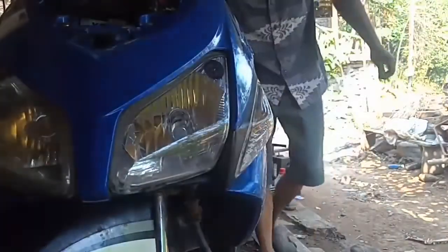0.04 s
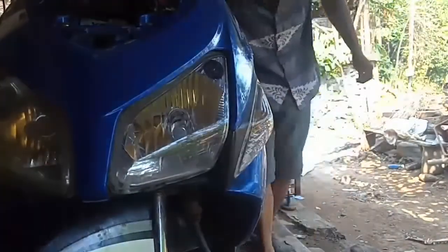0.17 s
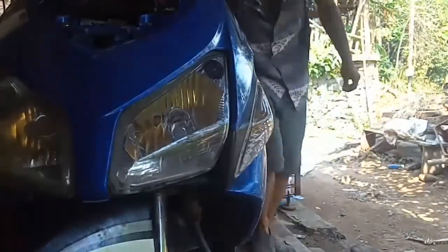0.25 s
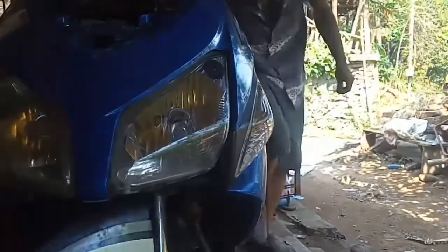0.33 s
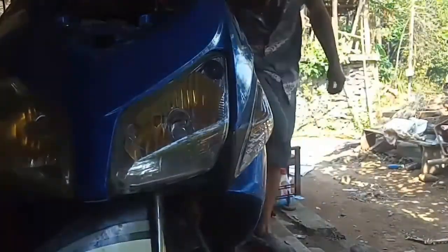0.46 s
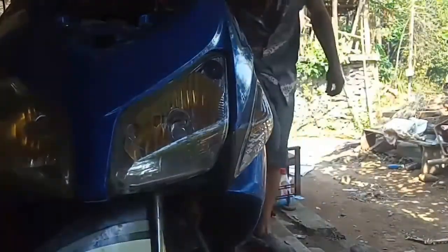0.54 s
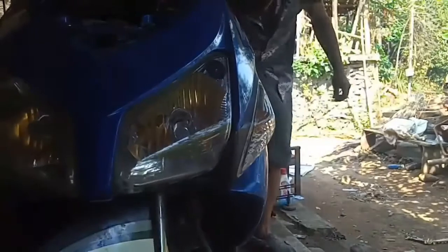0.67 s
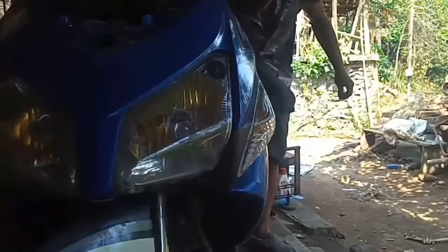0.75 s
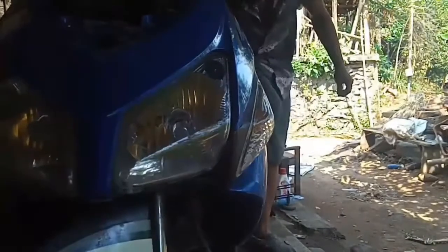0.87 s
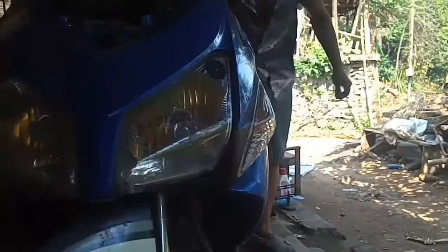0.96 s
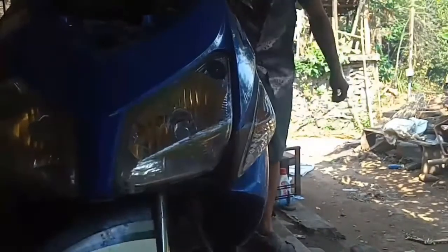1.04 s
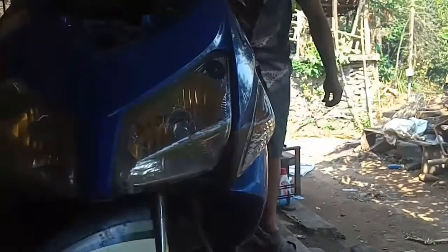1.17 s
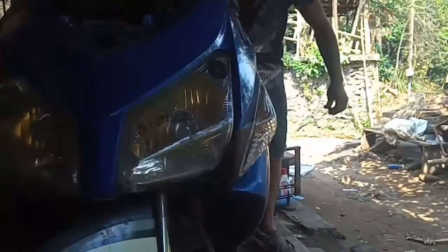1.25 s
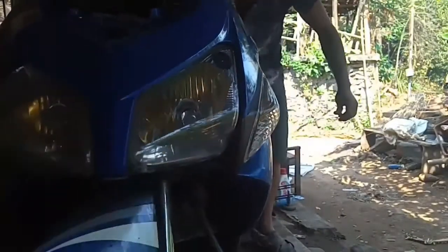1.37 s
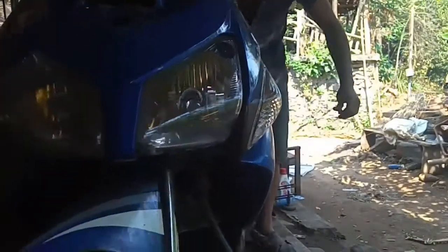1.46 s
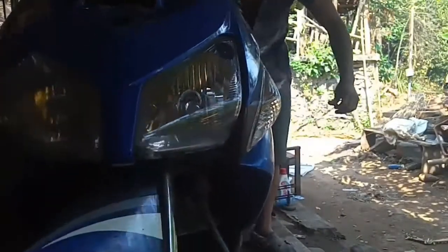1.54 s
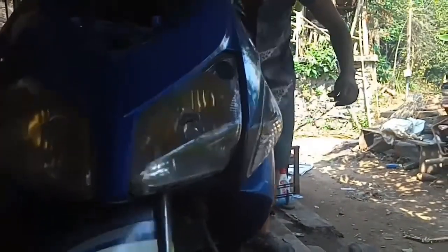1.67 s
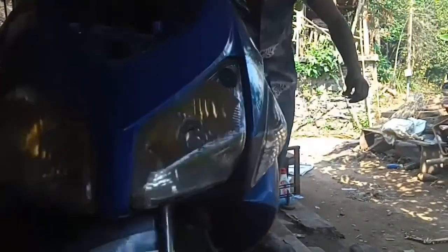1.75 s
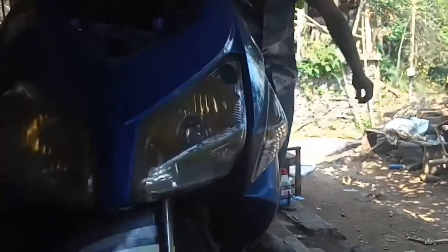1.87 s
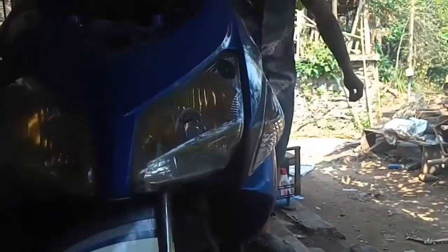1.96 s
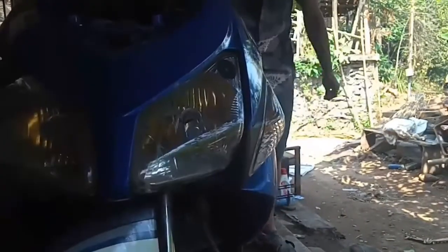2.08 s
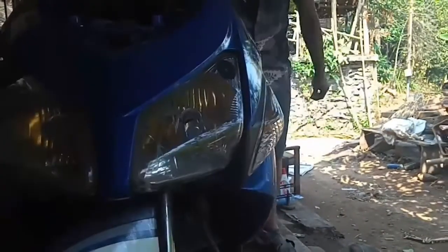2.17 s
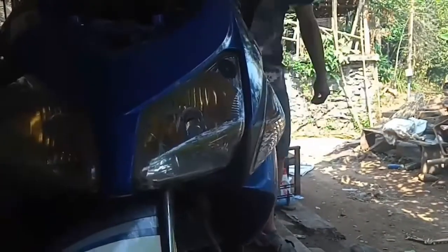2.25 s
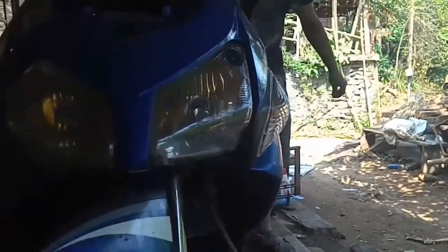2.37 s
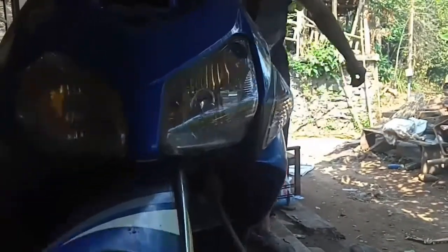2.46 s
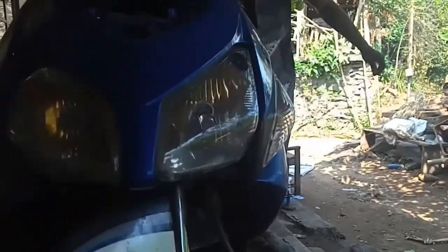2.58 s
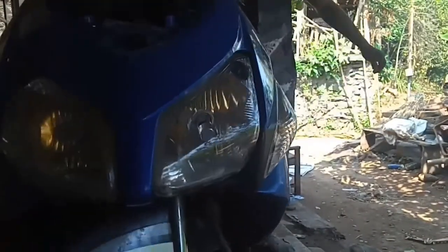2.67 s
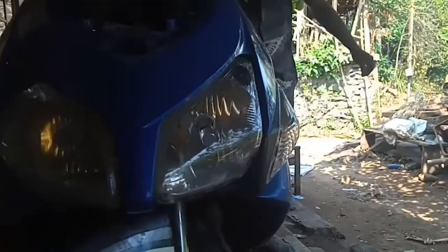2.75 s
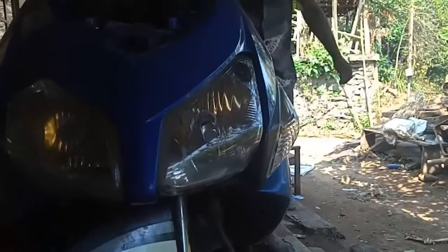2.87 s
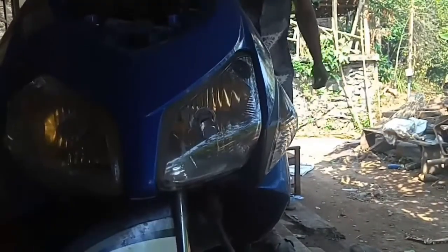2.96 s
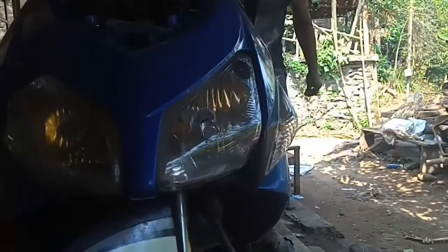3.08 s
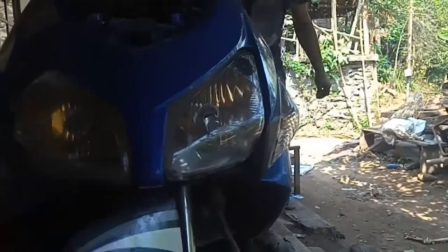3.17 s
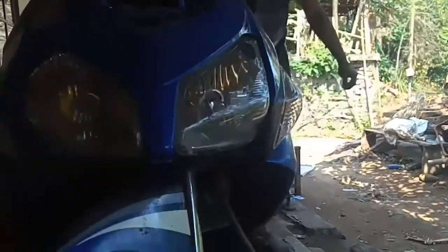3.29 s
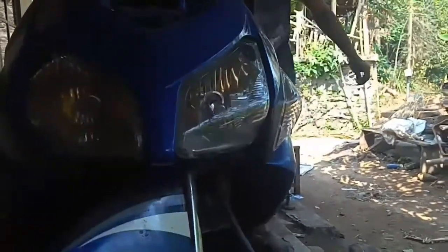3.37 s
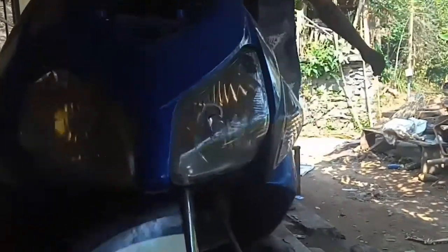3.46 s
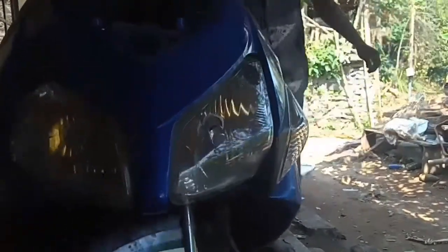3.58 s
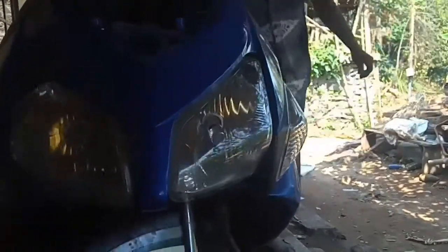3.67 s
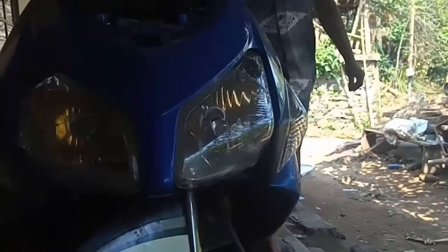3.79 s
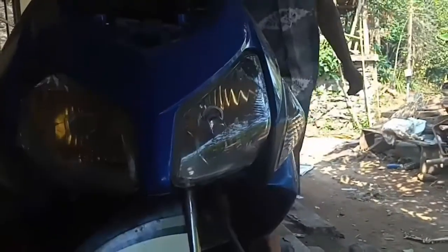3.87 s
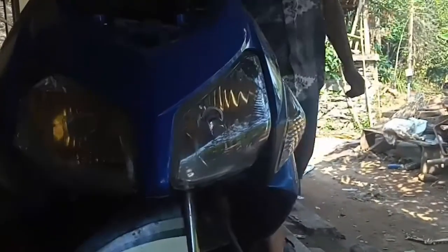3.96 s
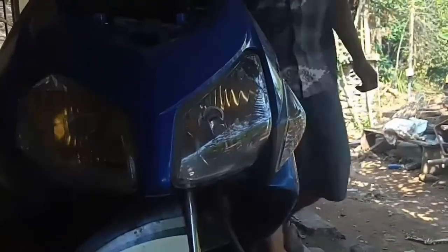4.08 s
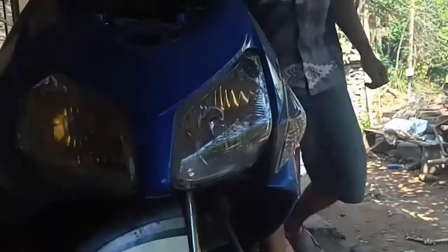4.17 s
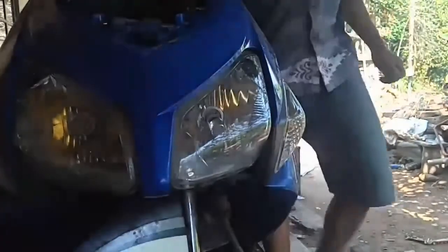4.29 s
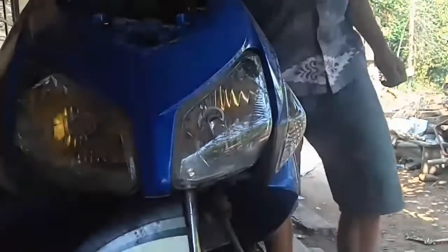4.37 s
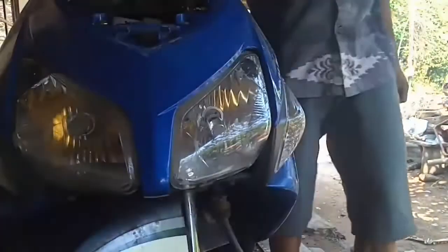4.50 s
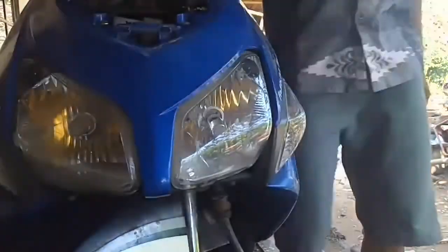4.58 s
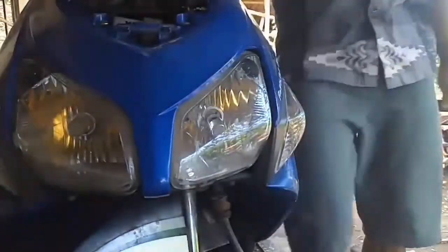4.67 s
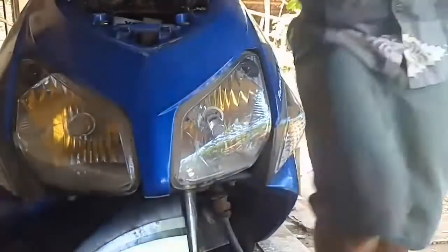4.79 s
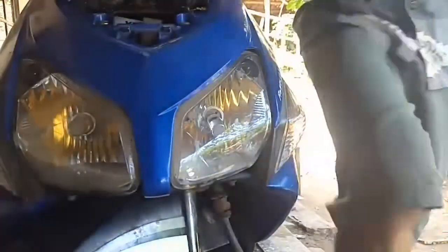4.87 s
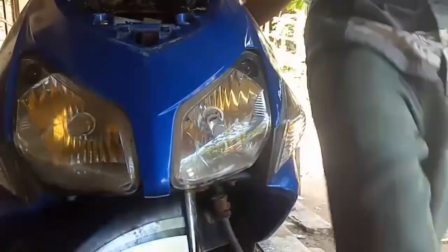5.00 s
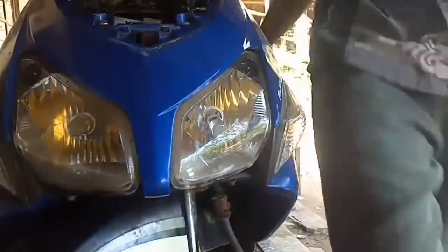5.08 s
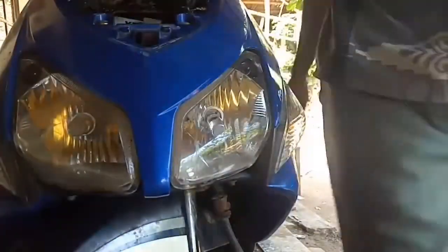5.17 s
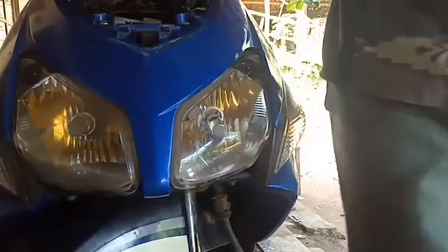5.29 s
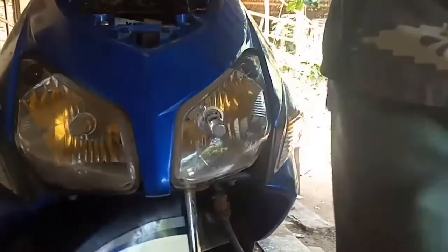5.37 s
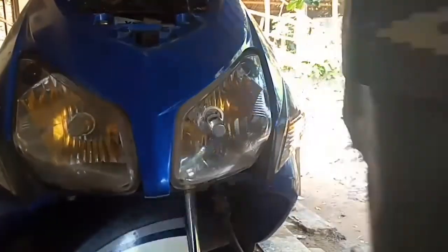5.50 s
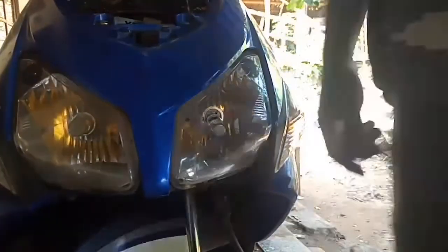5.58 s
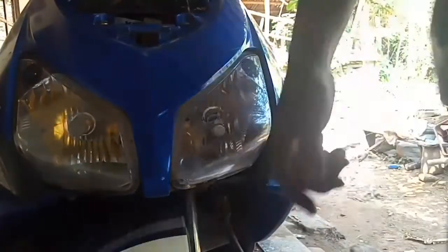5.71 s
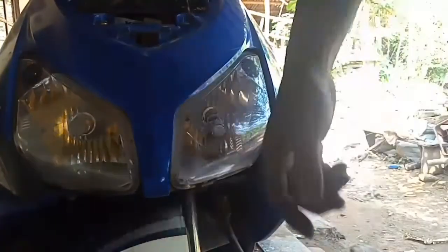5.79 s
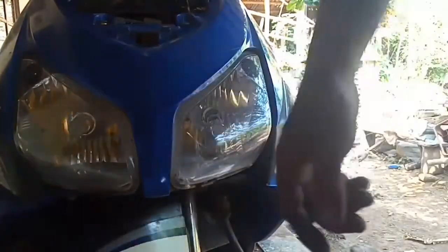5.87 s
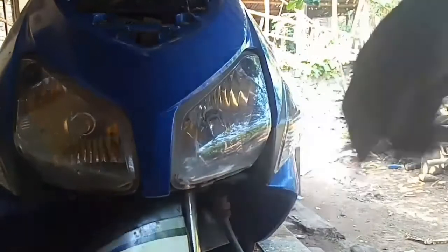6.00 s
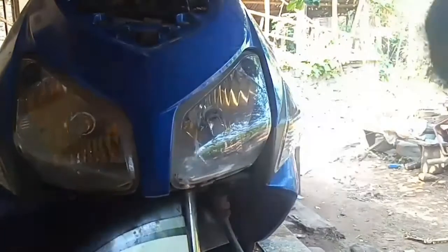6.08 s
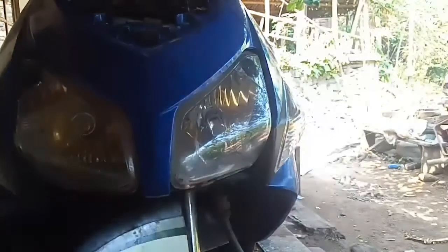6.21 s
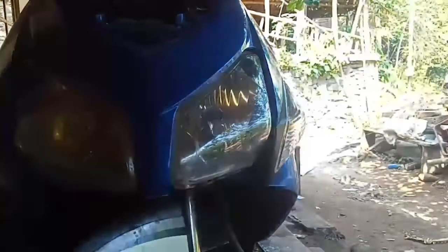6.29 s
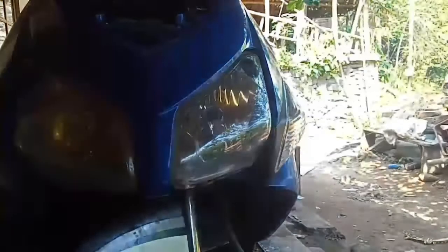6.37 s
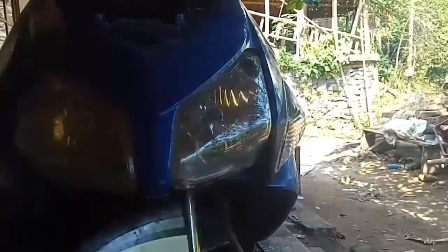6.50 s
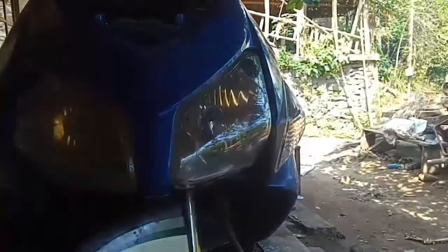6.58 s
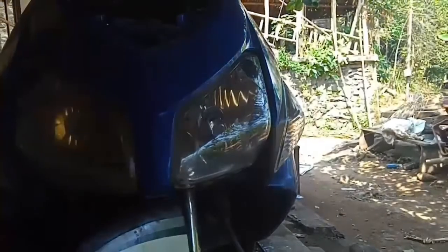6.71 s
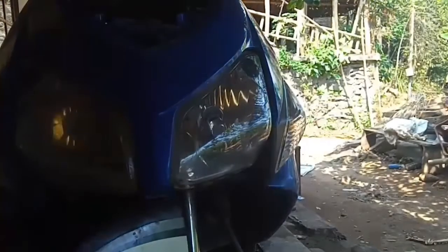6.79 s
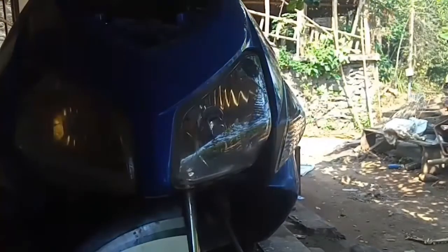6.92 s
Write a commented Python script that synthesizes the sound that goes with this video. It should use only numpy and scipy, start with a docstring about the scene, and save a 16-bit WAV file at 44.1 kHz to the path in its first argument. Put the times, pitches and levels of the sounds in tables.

```python
"""In a yard, a metre from a phone, a scooter is kicked over four times without starting. The lever
engages, the crank rumbles, the engine thumps, the lever hits its stop and its gear rasps back. Then feet
shuffle on gritty concrete, a small steel part tinkles, things are shifted close by and air buffets the
microphone, all over a far hiss. Rattles and scrapes are thousands of tiny clicks, filtered to sound like
the part they shake."""
import sys
import numpy as np
from scipy import signal
from scipy.fft import rfft, irfft
from scipy.io import wavfile
from scipy.ndimage import uniform_filter1d

SR = 44100
rng = np.random.default_rng(int(sys.argv[2]) if len(sys.argv) > 2 else 0)


def to_wav(s):
    """Save 16-bit WAV."""
    ch = np.atleast_2d(s).T  # columns
    pcm = np.round(np.clip(ch, -1, 1) * 32767)  # PCM
    wavfile.write(sys.argv[1], SR, pcm.astype(np.int16))


N = 306315
TIME = np.arange(N) / SR

# Tone of the far hiss: pitch_hz, level_db
HISS_TONE = [(90, -13.5), (150, -5), (400, -6.5), (900, -10), (1800, -11.5), (3300, -9), (4200, -13.5),
             (5100, -19), (6300, -15), (7700, -9), (9500, -21), (12000, -24.5), (16000, -22.5)]
# Loudness of the far hiss: time_s, level_db
HISS_LEVELS = [(0, -52), (.6, -55), (3.6, -55), (4.7, -58.5), (5.5, -59), (6.95, -55)]
# Low rumbling swells, engine thumps during the kicks and air on the microphone otherwise:
# loudest_s, level_db, rise_and_fall_db_per_s
LOW_SWELLS = [(0.05, -68, 60), (0.58, -61, 64), (0.89, -54.5, 75), (1.43, -41, 122), (1.66, -52.5, 80),
              (2.18, -49, 700), (2.37, -44, 200), (2.58, -50, 40), (2.82, -52, 150), (3.1, -55, 140),
              (3.32, -44, 87), (3.96, -65, 120), (5.2, -60, 100), (5.45, -56.5, 48), (5.78, -39, 212),
              (6.01, -39.5, 200), (6.13, -48, 150), (6.25, -51, 170), (6.37, -56, 300), (6.46, -59, 130),
              (6.62, -60, 100), (6.85, -56.5, 110)]
# Sudden jolts of air on the microphone: start_s, level_db, pitch_hz, rise_s
AIR_JOLTS = [(1.429, -39.5, 202, 0.0097), (2.167, -51, 117, 0.011), (5.399, -51, 94, 0.0081),
             (5.745, -63, 116, 0.016), (5.772, -30, 127, 0.011), (5.884, -39, 118, 0.0078),
             (5.994, -28.5, 105, 0.0046)]

# Touches on a small steel part: start_s, level_db, muffled_after_s
STEEL_TOUCHES = [(5.354, -44, 0.067), (5.424, -38, 0.059)]
# The notes it rings with: pitch_hz, level_db, fade_s (time to drop 60 dB)
STEEL_NOTES = [(2779, 2, 0.6), (4920, -4, 0.24), (5800, -13, 0.47), (7270, -4, 0.35), (9600, -22, .2),
               (10150, -18, .4), (12310, -21, 0.55)]
# Bright tone of grit and hard edges: pitch_hz, level_db
TICK_TONE = [(4000, -41.5), (5300, -7), (6500, -0.5), (7800, 5.5), (9300, -5), (11500, -9.5), (14000, -4.5),
             (16500, -14.5)]
# Footfalls and small knocks: start_s, knock_db, knock_hz, thud_hz, thud_db, tick_db, base_fade_s
STEPS = [(0.4468, -30.5, 647, 370, -28.5, -54, 0.043), (3.9285, -32.5, 1340, 765, -40, -58, 0.071),
         (4.1609, -30, 1220, 282, -34, -35, 0.051), (4.2837, -30, 1770, 360, -55, -54, 0.16),
         (4.4331, -37.5, 1440, 370, -48, -53, 0.049), (4.472, -29.5, 1420, 475, -57, -50, 0.044),
         (4.4837, -24.5, 1080, 562, -31.5, -44, 0.059), (4.5442, -28.5, 3580, 370, -58, -30.5, 0.13),
         (4.6061, -20.5, 1870, 566, -28, -26.5, 0.063), (5.148, -35.5, 1290, 280, -37.5, -24.5, 0.033),
         (5.1831, -26.5, 2000, 860, -37, -30, 0.059), (5.2042, -27.5, 2180, 740, -49, -21, 0.042),
         (5.2154, -27.5, 3900, 380, -58, -41, 0.055), (5.2936, -22, 3980, 880, -45, -13.5, 0.07),
         (5.3158, -30.5, 1110, 323, -42, -36, 0.044), (5.3356, -29, 4170, 880, -47, -23, 0.074),
         (5.3504, -26, 2850, 870, -50, -40, 0.045), (5.4221, -21, 3070, 910, -40, -26, 0.038),
         (5.8124, -45, 3270, 200, -60, -36, 0.059), (5.9359, -11.5, 2020, 660, -39, -40, 0.051),
         (5.9464, -13.5, 1430, 190, -33, -40, 0.1), (6.0091, -26, 3880, 199, -41, -34, 0.072),
         (6.0222, -21.5, 2700, 462, -36.5, -52, 0.093), (6.0418, -29, 2870, 237, -57, -31.5, 0.21),
         (6.4054, -26.5, 3050, 538, -61, -38, 0.05), (6.4326, -31, 3030, 417, -60, -38, 0.032),
         (6.5217, -10.5, 1620, 802, -44, -36, 0.29), (6.6284, -40, 3350, 755, -46, -21.5, 0.12),
         (6.7534, -33, 2800, 272, -49, -28, 0.049), (6.8051, -17.5, 1413, 310, -29, -35, 0.036),
         (6.8423, -28, 2130, 730, -36, -45, 0.078)]
# Soles and cloth dragging: loudest_s, scrape_db, hiss_db, rub_db, rise_db_per_s, fall_db_per_s
DRAGS = [(0.454, -57, -56, -44.5, 2000, 157), (3.941, -58, -88, -50.5, 400, 252),
         (4.163, -54.5, -55, -45, 1200, 198), (4.286, -77, -56, -45, 900, 282),
         (4.49, -49, -51.5, -41.5, 502, 304), (4.615, -48.5, -51, -41, 174, 308),
         (5.207, -43.5, -42.5, -45, 226, 211), (5.354, -42.5, -42.5, -52.5, 202, 397),
         (5.435, -46.5, -51, -57, 1500, 300), (5.954, -42, -58, -34, 2000, 600),
         (6.022, -43, -50, -37, 1200, 272), (6.275, -45, -37, -51.5, 175, 117),
         (6.502, -35.5, -34.5, -45.5, 155, 291), (6.533, -28, -33, -43.5, 1500, 420),
         (6.58, -41.5, -40.5, -49, 300, 150), (6.634, -38, -42, -50, 650, 310),
         (6.758, -48.5, -49, -55, 87, 550), (6.818, -57, -49, -39, 2000, 400),
         (6.858, -40.5, -47.5, -43, 500, 700), (6.946, -44.5, -50, -73, 700, 300)]

# Tone of rasping gear teeth: pitch_hz, level_db
RASP_TONE = [(500, -8.5), (1000, 3), (2000, 4), (3000, 7), (4000, 10.5), (4900, -1.5), (6000, -23.5)]
# Where the gear and its cover ring: pitch_hz, width_hz, level_db
GEAR_NOTES = [(1180, 135, -12), (2027, 30, 5.5), (2180, 70, 0), (3080, 87, -6.5), (3614, 88, -3),
              (3805, 104, -4), (3990, 37, -0.5), (4190, 110, -9), (6400, 98, -1.5), (7210, 140, -6),
              (8400, 107, -8.5), (10300, 110, -10), (12000, 540, -16.5), (13700, 150, -26)]
# Where the crankcase rings: pitch_hz, width_hz, level_db
CASE_NOTES = [(1154, 79, 11), (1692, 33, 14), (2000, 22, 15.5), (3670, 11, -7), (3860, 31, -14.5),
              (4740, 180, -9), (6890, 38, 8), (7900, 37, -16), (8470, 31, -14.5), (7540, 33, -26)]
# Where the body panels ring: pitch_hz, width_hz, level_db
PANEL_NOTES = [(334, 190, 2), (582, 53, -2)]
# Blows of the lever and stand:
# start_s, knock_db, knock_hz, thud_hz, thud_db, tick_db, crack_vs_knock_db, base_fade_s
CLANKS = [(0.5347, -33, 1320, 468, -36, -52, -8, 0.15), (0.5867, -28, 3130, 830, -35, -14, 5, 0.053),
          (0.9016, -23, 1500, 640, -37, -17, -6, 0.24), (1.2323, -28.5, 3200, 325, -48, -25, -14, 0.19),
          (1.3314, -45, 1510, 587, -21.5, -25.5, -8, 0.14), (1.364, -37, 1200, 562, -27, -33, -8, 0.16),
          (1.4072, -39, 1640, 267, -25, -26.5, -6, 0.091), (1.481, -12.5, 2060, 677, -33, -9.5, -12, 0.25),
          (1.701, -18.5, 2020, 644, -29, -31, -14, 0.07), (1.8603, -14.5, 1630, 592, -25.5, -46, 7, 0.17),
          (1.9039, -30, 570, 338, -13, -55, 7, 0.07), (1.9534, -28.5, 1180, 663, -44, -35.5, -14, 0.4),
          (2.2323, -23.5, 2100, 350, -21, -25, -16, 0.15), (2.328, -26, 1420, 580, -43, -36, -12, 0.15),
          (2.4017, -18, 2000, 365, -27, -27, -13, 0.47), (2.4302, -14.5, 2000, 730, -43, -14.5, -30, 0.46),
          (2.9085, -13.5, 1636, 528, -35, -31, -26, 0.32), (2.9628, -43, 1760, 334, -25, -55, -8, 0.066),
          (3.0817, -29, 2130, 334, -29, -34.5, 11, 0.19), (3.1886, -23.5, 1440, 585, -36.5, -43, -16, 0.19),
          (3.2671, -24, 1280, 376.5, -29, -31.5, -14, 0.63),
          (3.296, -11.5, 1880, 370, -47, -13.5, -12, 0.36)]
# The foot turns the crank: full_speed_s, hold_s, rumble_db, rasp_db, hiss_db
KICKS = [(0.552, 0.03, -49.5, -59.5, -56), (1.341, 0.13, -36, -49, -51), (2.33, 0.092, -35.5, -59, -53.5),
         (3.181, 0.12, -36, -62, -57)]
# Loose parts rattle on after hard blows: loudest_s, rasp_db, rumble_db, hiss_db, ring_db
RATTLES = [(0.593, -32, -42.5, -36, -64), (0.91, -38.5, -45.5, -59, -63), (0.981, -54, -73, -55, -58),
           (1.239, -47, -48, -64, -70), (1.488, -28, -39.5, -49, -27.5), (1.572, -56, -40, -49, -60),
           (1.653, -52, -37.5, -47.5, -47), (1.87, -49, -38, -60, -59), (1.917, -50, -40.5, -50.5, -62),
           (1.96, -48.5, -48, -59, -69), (2.238, -36, -34, -46, -66), (2.442, -25, -32.5, -28, -29),
           (2.538, -46, -39, -58, -51), (2.92, -50, -39.5, -58, -65), (2.969, -62, -60, -66, -70),
           (3.093, -40.5, -44, -57, -63), (3.308, -28, -35.5, -40, -32)]
# The lever ratchets back up: full_level_s, hold_s, rise_db_per_s, ring_db, rasp_db, hiss_db, rumble_db
LEVER_RETURNS = [(0.685, 0.047, 400, -37, -36.5, -32, -46.5), (1.708, 0.1, 898, -30, -38, -33, -44.5),
                 (2.64, 0.14, 326, -32.5, -40.5, -34, -44.5), (3.464, 0.073, 242, -34, -44, -36, -45.5)]


def gain(db):
    """Turn decibels into a number to multiply by."""
    return 10 ** (np.asarray(db) / 20)


def unit(x):
    """Scale a sound to an average (rms) level of 1."""
    return x / np.sqrt(np.mean(x ** 2))


def band(x, low_hz, high_hz):
    """Keep the sound between two pitches."""
    return signal.sosfilt(signal.butter(2, [low_hz, high_hz], "band", fs=SR, output="sos"), x)


def colour(x, tone):
    """Filter a sound to follow a table of pitch_hz, level_db."""
    hz, db = np.transpose(tone)
    curve_db = np.interp(np.log(np.linspace(1, SR / 2, 513)), np.log(hz), db)
    cepstrum = irfft(np.log(gain(curve_db)))
    cepstrum[1:512] *= 2  # folded forward, so the filter rings only after a click
    cepstrum[513:] = 0
    return signal.oaconvolve(x, irfft(np.exp(rfft(cepstrum))))[:N]


def ring(x, notes):
    """A shaken part rings at its own pitches."""
    return sum(gain(db) * signal.lfilter(*signal.iirpeak(hz, hz / width, fs=SR), x)
               for hz, width, db in notes)


def grit(clicks_per_s, spread_db):
    """Many tiny random contacts of uneven strength."""
    chance, size, sign = rng.random((3, N))
    strength = gain(-spread_db * np.log(1 - .97 * size))
    return unit((chance < clicks_per_s / SR) * strength * np.sign(sign - .5))


def waver(rate_hz, depth_db):
    """A gain that glides between random levels."""
    step = int(SR / rate_hz)
    levels = np.repeat(rng.standard_normal(N // step + 1), step)
    return gain(depth_db * 1.72 * uniform_filter1d(levels, step)[:N])


def swell(at_s, level_db, rise_db_per_s, fall_db_per_s, hold_s=0):
    """A gain for many events: each rises, holds, then falls; their powers add."""
    rows = zip(*np.broadcast_arrays(at_s, level_db, rise_db_per_s, fall_db_per_s, hold_s))
    t = TIME[::32]
    power = sum(gain(db - rise * np.maximum(s - t, 0) - fall * np.maximum(t - s - hold, 0)) ** 2
                for s, db, rise, fall, hold in rows)
    return np.interp(TIME, t, np.sqrt(power))


def blows(events, thud, knock, tick, thud_fade_scale, tick_fade_scale, note_db):
    """Each blow cracks, then dies away as a middle knock, a low thud and a bright tick."""
    out = np.zeros(N)
    for start_s, knock_db, knock_hz, thud_hz, thud_db, tick_db, crack_db, base_fade_s in events:
        start = int(start_s * SR)
        t = TIME[:min(N - start, SR // 3)]
        span = slice(start, start + len(t))
        # a rattle peaks at about 4 times its average level
        knock_fade, thud_fade, tick_fade = (gain(-60 * t / (scale * base_fade_s)) / 4
                                            for scale in (0.36, thud_fade_scale, tick_fade_scale))
        click = 1. * (t == 0)
        crack = band(band(click, .4 * knock_hz, 1.3 * knock_hz), 360, 5.2 * knock_hz)
        hardness = min(1., .065 / base_fade_s) ** 1.5  # long rattles start with a softer contact
        struck = knock[span] * knock_fade + gain(crack_db) * hardness * crack / crack.max()
        struck += ring(struck, [(knock_hz, 0.043 * knock_hz, note_db)])  # the struck spot's own note
        hollow = 0.47 * thud[span] + 2.5 * np.sin(2 * np.pi * thud_hz * t)
        hollow *= (1 - np.exp(-t / 0.0012)) * thud_fade
        bright = tick[span] * tick_fade
        out[span] += gain(knock_db) * struck + gain(thud_db) * hollow + gain(tick_db) * bright
    return out


def far_hiss():
    """A smooth hiss from far away."""
    hiss = unit(colour(rng.standard_normal(N), HISS_TONE) * waver(19, 0.077))
    return hiss * gain(np.interp(TIME, *np.transpose(HISS_LEVELS)))


def low_swells():
    """A low rumble swells: engine thumps during the kicks, air on the microphone otherwise."""
    rumble = unit(band(band(rng.standard_normal(N), 32, 187), 48.6, 160))
    at_s, db, slope = np.transpose(LOW_SWELLS)
    calm = gain(-69) * waver(rate_hz=5.26, depth_db=2)
    return rumble * np.hypot(swell(at_s, db, slope, slope), calm)


def air_jolts():
    """Each jolt of air on the microphone is a short, rounded pulse of a low note."""
    out = np.zeros(N)
    for start_s, db, hz, rise_s in AIR_JOLTS:
        t = TIME - start_s
        out += gain(db) * np.sin(2 * np.pi * hz * t) * np.exp(-(t / rise_s - 1) ** 2)
    return out


def wall_echo(sound, fade_s=0.12, level_db=-16.5):
    """A shed wall and the ground send back a short, dull wash of sound."""
    t = TIME[:SR // 2]
    wash = band(rng.standard_normal(len(t)), 160, 4900) * gain(-60 * t / fade_s) * (t > .004)
    wash *= gain(level_db) / np.sqrt(np.sum(wash ** 2))
    return signal.oaconvolve(sound, wash)[:N]


def steel_tinkle():
    """A small steel part rings after each touch until it is muffled."""
    out = np.zeros(N)
    t = TIME[:SR // 4]
    for start_s, db, muffled_after_s in STEEL_TOUCHES:
        notes = sum(gain(note_db - 60 * t / fade_s) * np.sin(2 * np.pi * (hz * t + rng.random()))
                    for hz, note_db, fade_s in STEEL_NOTES)
        shape = (1 - np.exp(-t / .012)) / (1 + (t / muffled_after_s) ** 8)
        out[int(start_s * SR):][:len(t)] += gain(db) * notes * shape
    return out


def feet(crack_db=-6.5):
    """Soles crush grit in short knocks and long drags."""
    crush = grit(clicks_per_s=5000, spread_db=3)
    drag = grit(8000, 2.5) * waver(70, 1.1)
    steps = [(*row[:6], crack_db, row[6]) for row in STEPS]
    knocks = blows(steps, thud=unit(band(crush, 230, 480)), knock=unit(band(crush, 1100, 3200)),
                   tick=unit(colour(crush, TICK_TONE)),
                   thud_fade_scale=1.62, tick_fade_scale=0.67, note_db=9.2)
    at_s, scrape_db, hiss_db, rub_db, rise, fall = np.transpose(DRAGS)
    scrape = unit(band(band(drag, 880, 4580), 820, 3930)) * swell(at_s, scrape_db, rise, fall)
    hiss = unit(colour(drag, TICK_TONE)) * swell(at_s, hiss_db, rise, fall)
    rub = unit(band(drag, 164, 1134)) * swell(at_s, rub_db, rise, fall)
    return knocks + scrape + hiss + rub


def kick_gains():
    """The foot drives the crank round until the lever stops."""
    at_s, hold_s, rumble_db, rasp_db, hiss_db = np.transpose(KICKS)
    return {name: swell(at_s, db, rise_db_per_s=217, fall_db_per_s=400, hold_s=hold_s)
            for name, db in (("rasp", rasp_db), ("rumble", rumble_db), ("hiss", hiss_db))}


def rattle_gains():
    """Loose parts rattle on after a blow; the rumble fades slowest."""
    at_s, rasp_db, rumble_db, hiss_db, ring_db = np.transpose(RATTLES)
    layers = (("rasp", rasp_db, 245), ("rumble", rumble_db, 199),
              ("hiss", hiss_db, 245), ("ring", ring_db, 245))
    return {name: swell(at_s, db, rise_db_per_s=2500, fall_db_per_s=fall) for name, db, fall in layers}


def return_gains():
    """The lever ratchets back up; the gear's ring fades slowest."""
    at_s, hold_s, rise, ring_db, rasp_db, hiss_db, rumble_db = np.transpose(LEVER_RETURNS)
    layers = (("rasp", rasp_db, 373), ("rumble", rumble_db, 373),
              ("hiss", hiss_db, 373), ("ring", ring_db, 255))
    return {name: swell(at_s, db, rise, fall, hold_s) for name, db, fall in layers}


def scooter():
    """Gear teeth rasp in their cover, the crank shakes the panels and blows rattle the crankcase."""
    teeth = grit(6000, 3) * waver(90, 1.3)
    # the teeth touch at changing spots, so each note comes and goes on its own
    gear = sum(ring(teeth * waver(45, 3), [note]) for note in GEAR_NOTES)
    shake = grit(2000, 2) * waver(50, 1.5)
    panels = unit(unit(band(shake, 220, 2020)) + gain(4.5) * unit(ring(shake, PANEL_NOTES)))
    rattle = grit(6000, 2.5)
    case = unit(unit(band(rattle, 440, 2380)) + gain(-3) * unit(ring(rattle, CASE_NOTES)))
    out = blows(CLANKS, thud=panels, knock=case, tick=unit(colour(rattle, TICK_TONE)),
                thud_fade_scale=0.67, tick_fade_scale=0.66, note_db=8.3)
    layers = dict(rasp=colour(teeth, RASP_TONE), rumble=panels, hiss=colour(teeth, TICK_TONE), ring=gear)
    motions = kick_gains(), rattle_gains(), return_gains()
    for name, sound in layers.items():
        power = sum(motion.get(name, 0) ** 2 for motion in motions)
        out += unit(sound) * np.sqrt(power)
    return out


def scene():
    """Mix the close sounds, their echo and the background into one channel."""
    near = scooter() + feet() + steel_tinkle()
    return (near + wall_echo(near) + low_swells() + far_hiss() + air_jolts())[None]


def record(dry):
    """The phone drops the deepest bass and the highest treble."""
    no_bass = signal.sosfilt(signal.butter(2, 45, "high", fs=SR, output="sos"), dry)
    return signal.sosfilt(signal.ellip(10, .2, 70, 16000, fs=SR, output="sos"), no_bass)


dry = scene()
out = record(dry)
to_wav(out)
```